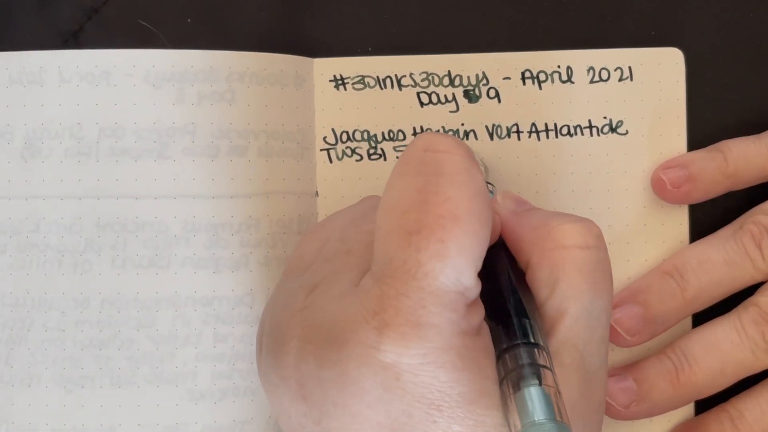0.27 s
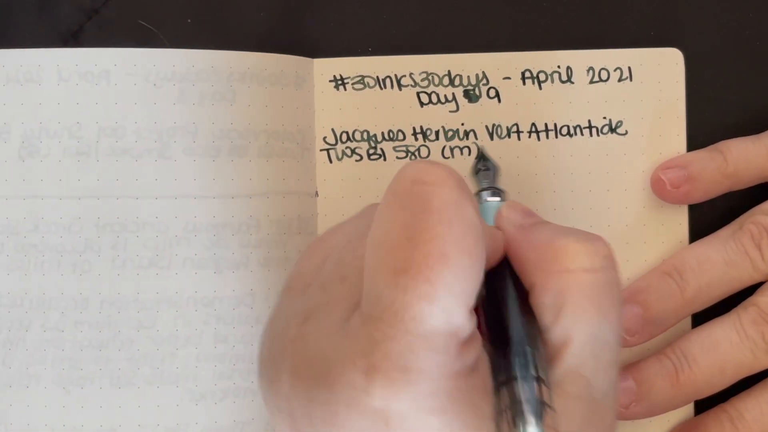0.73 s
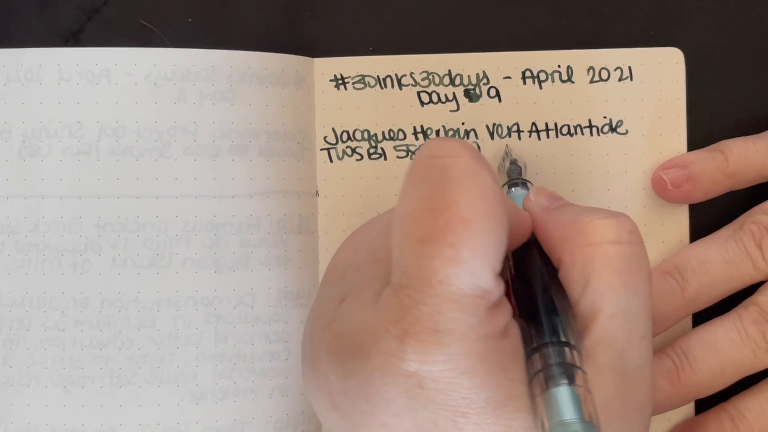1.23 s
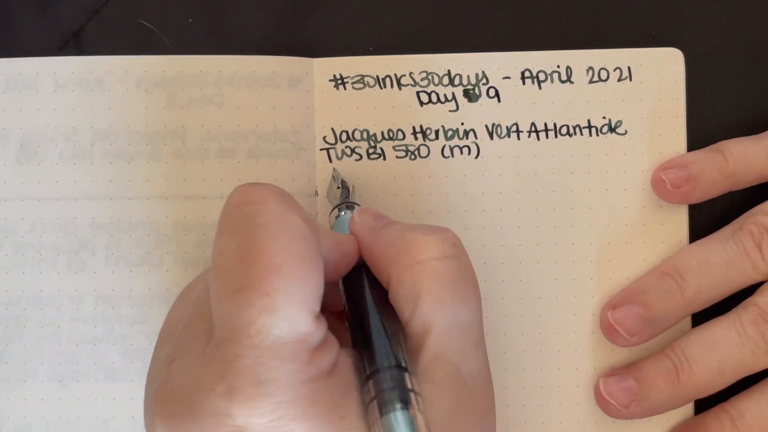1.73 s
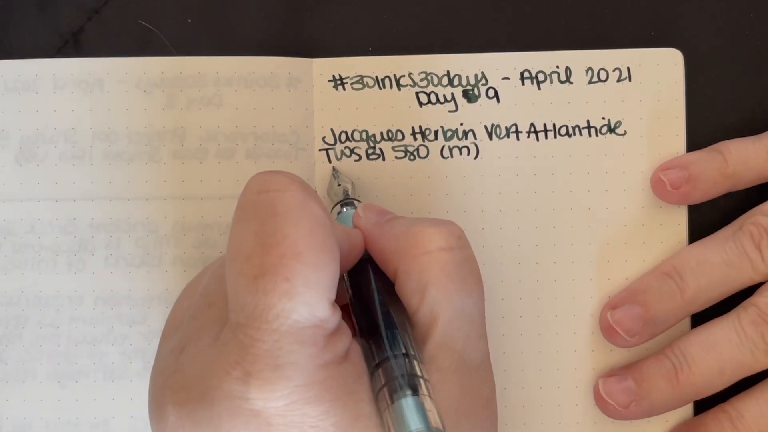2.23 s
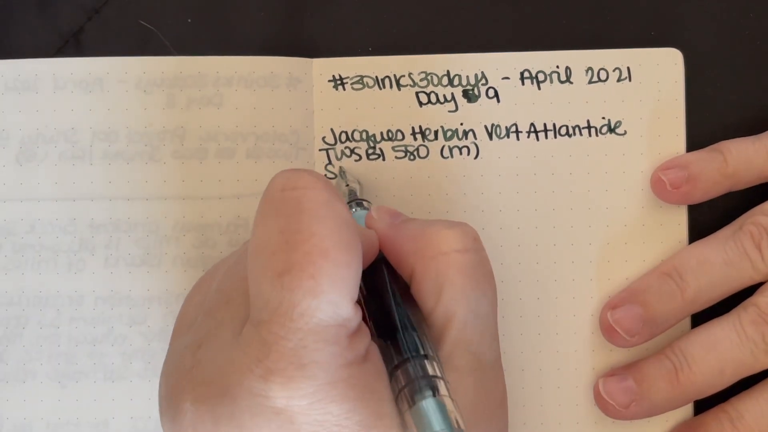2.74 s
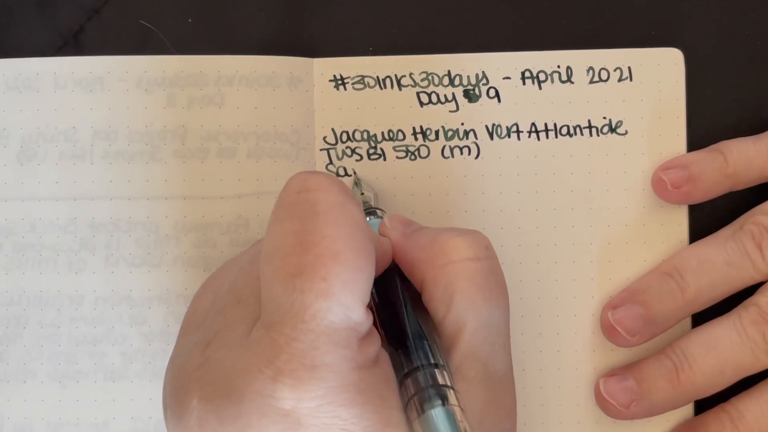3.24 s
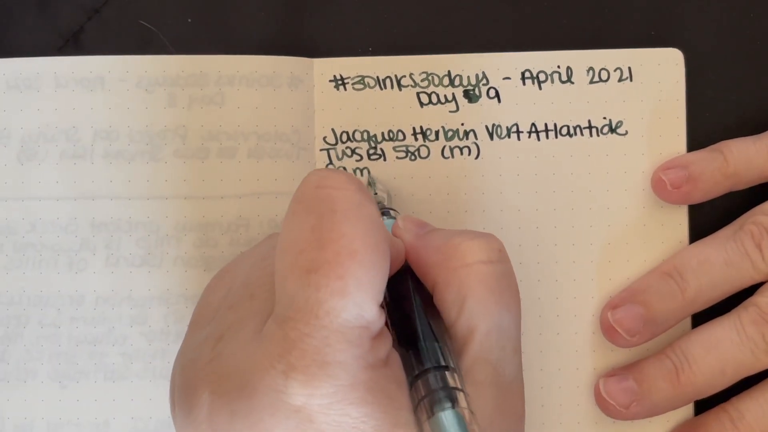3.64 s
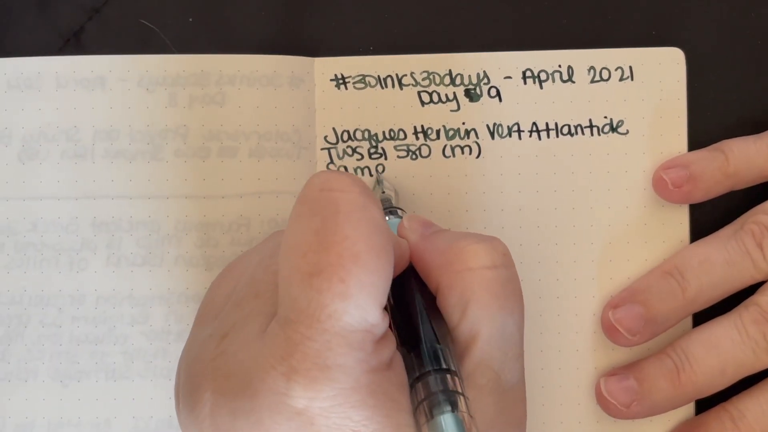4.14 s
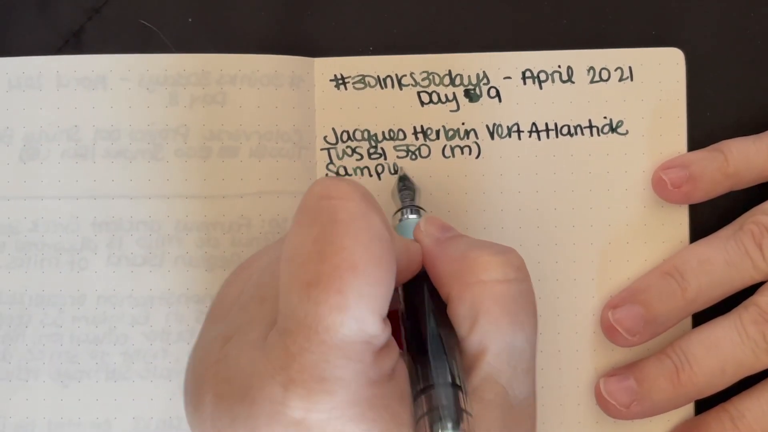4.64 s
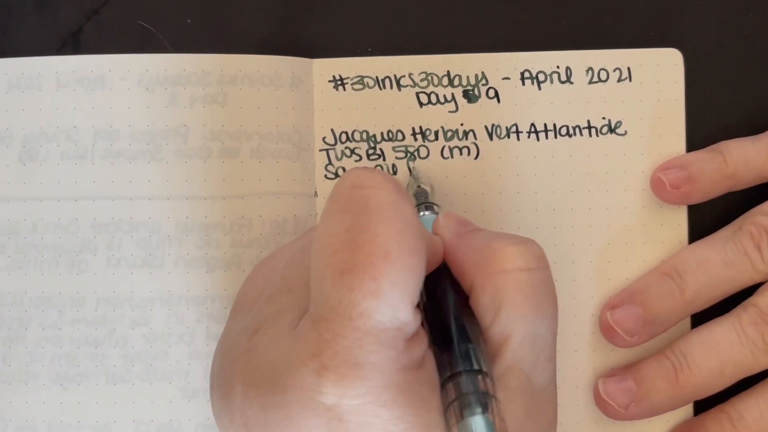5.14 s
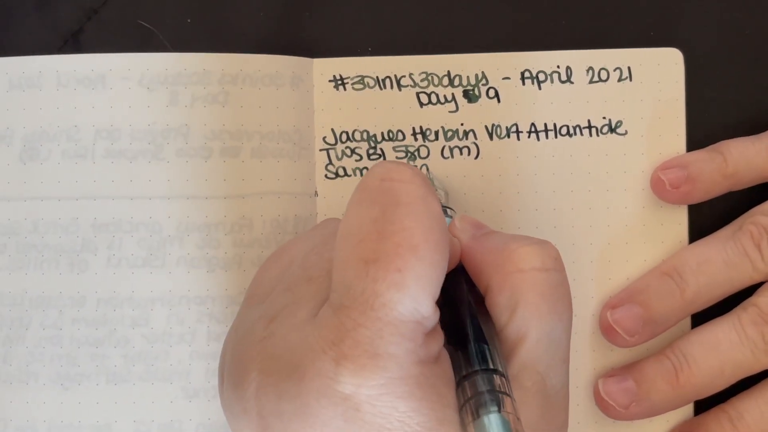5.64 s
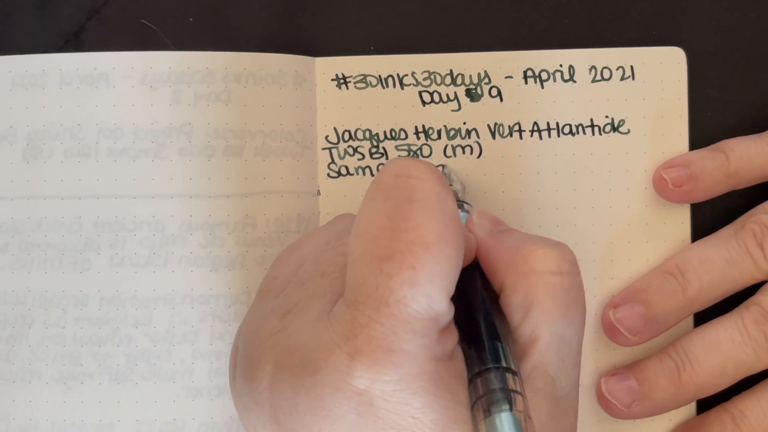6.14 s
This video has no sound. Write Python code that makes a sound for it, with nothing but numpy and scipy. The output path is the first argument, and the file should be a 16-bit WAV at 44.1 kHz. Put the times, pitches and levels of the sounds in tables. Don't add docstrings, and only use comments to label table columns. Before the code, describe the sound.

Very quiet, dry handwriting heard by a close microphone: papery palm rustle, a light double tap, two quick drags, then short whispery nib strokes in irregular groups. The loudest sound is a blunt knock of pen on page; a second knock arrives with a brisk hand slide. Near the end the nib sings faintly. A small room hums underneath with fan, airflow, low rumble and hiss.

```python
import sys
import numpy as np
from scipy import signal
from scipy.fft import rfft, irfft
from scipy.io import wavfile
from scipy.ndimage import uniform_filter1d

SR = 44100
rng = np.random.default_rng(int(sys.argv[2]) if len(sys.argv) > 2 else 0)


def makeup_ratio(level_db):
    decades = np.asarray(level_db, float) / 20
    return 10 ** decades


def transcribe(u):
    v = np.clip(np.atleast_2d(u).T, -1, 1)
    q = np.round(v * 32767).astype(np.int16)
    wavfile.write(sys.argv[1], SR, q)


N = 281799

# (time [s], level [dB])
RUMBLE_LEVEL = [(0.0, -45), (0.48, -47), (0.82, -40), (1.21, -51.5), (1.47, -37.5), (1.53, -46.5),
                (1.64, -37), (2.03, -51), (3.01, -42), (3.11, -53), (3.36, -39.5), (3.49, -55),
                (3.79, -37.5), (3.81, -44), (5.09, -37.5), (5.11, -44.5), (6.21, -38.5), (6.39, -46.5)]
# (time [s], level [dB])
AIR_LEVEL = [(0, -58.5), (.85, -60), (2.0, -58.6), (2.9, -58), (4.2, -60), (5.6, -59), (6.39, -59)]
# (time [s], level [dB])
DUCT_LEVEL = [(0, -57), (.66, -57), (1.28, -63), (2.4, -59), (2.7, -57), (4.3, -57), (4.6, -61),
              (6.39, -57)]
# (frequency [Hz], density [dB per Hz])
RUMBLE_SPECTRUM = [(3, -12), (7, -1), (14, -7), (20, -6.5), (23, -5.5), (26, -23), (30, -35)]
DUCT_SPECTRUM = [(22, -7), (30, -2), (50, -7.5), (85, -15.5), (140, -15.5), (170, -39)]
AIR_SPECTRUM = [(100, -27), (150, -5), (205, 1.5), (260, -3.5), (430, -5), (600, -9), (800, -15.5),
                (1100, -12.5), (1500, -16.5), (2300, -24), (3000, -29)]
HISS_SPECTRUM = [(1290, -2), (2200, -10), (2390, -7.5), (2960, -3.5), (3190, -1), (3290, -0.5), (3640, -2),
                 (4930, -1.5), (5490, -2.5), (7700, -2), (9230, -3), (13900, -3), (15800, -4)]
MAINS_PARTIALS = {1: -73, 3: -59, 4: -82, 5: -63, 7: -75.5}
MOTOR_PARTIALS = {5: -72, 6: -69.5, 7: -69, 8: -73}
IN_STEP = {3: 1.09, 5: .987, 7: 1.093}
# (middle [s], length [s], frequency [Hz], width [Hz], level [dB])
BRUSHES = [(0.106, 0.76, 1120, 750, -62.5), (0.047, 0.29, 3200, 4000, -63), (0.19, 0.27, 3700, 4300, -60),
           (0.144, .07, 7000, 1100, -64), (.55, 0.12, 5500, 900, -68), (2.36, 0.044, 1100, 180, -57.5),
           (0.533, 0.25, 780, 580, -60.5), (2.22, 1, 2200, 390, -73.5), (5.2, 0.39, 1700, 810, -67),
           (5.628, .07, 8100, 250, -62), (1.495, 0.11, 1390, 280, -62), (5.612, .035, 13500, 3000, -59),
           (4.615, .1, 15000, 3000, -57), (4.61, .1, 3000, 1200, -64), (4.95, .1, 4250, 250, -69),
           (.33, .17, 4500, 2500, -66), (5.95, 0.45, 2500, 430, -77)]
# (start [s], rise [s], fall [s], drag [dB], page body re drag [dB])
SLIDES = [
    (.243, 0.023, .075, -61, -2),
    (0.655, 0.026, .08, -58, -13),
    (1.31, 0.043, 0.078, -54.5, -10),
    (1.452, .04, .075, -51, -9),
    (4.566, .066, .058, -49.5, -6),
    (5.604, 0.013, 0.075, -62, -5),
]
# (fastest moment [s], length [s], level [dB], lean from tip towards tines [dB])
STROKES = [(.53, 0.15, -72, -2), (1.65, .08, -73, -2), (2.068, 0.07, -68, -5), (2.23, .08, -66, 1),
           (2.335, .17, -65.5, 2), (2.475, .085, -61.5, 0), (2.765, .15, -64, 0), (2.872, .08, -75, 2),
           (2.967, .09, -66.5, 2.5), (3.15, .08, -69, 4), (3.235, .06, -68, -3), (3.35, .11, -66, -1),
           (3.488, .05, -73, 3), (3.58, 0.12, -70, -0.5), (3.78, .08, -68, 0), (3.89, .1, -69, 5),
           (4.036, 0.081, -70.5, -2), (4.27, 0.22, -71, -4), (4.47, .07, -71, -3),
           (4.794, 0.11, -66.5, -1.5), (4.958, 0.17, -68.5, -2.5), (2.42, .06, -69, -2),
           (5.202, .1, -70, 0), (5.482, 0.057, -68, -1.5), (5.589, .08, -67, -3), (5.697, .07, -68, -4),
           (5.91, .14, -74, -1), (6.165, .07, -72, -4), (6.276, .1, -71, -2), (6.385, .07, -69, 3)]
# (time [s], peak [dB], contact softness [Hz], body pitch [Hz], ring share [0-1])
KNOCKS = [
    (.8005, -46, 4500, 2600, .8),
    (.8065, -48, 3500, 1900, .5),
    (2.362, -50, 700, 1000, .6),
    (3.108, -50, 9000, 5000, .3),
    (4.19, -54, 14000, 9000, .5),
    (2.5131, -24, 1050, 900, .17),
    (4.6249, -30, 1500, 1150, .35),
]
# (time [s], pitch [Hz], level [dB rms])
SQUEAK_START = [
    (5.07, 4150, -79),
    (5.11, 4350, -76),
    (5.16, 4700, -80),
]
SQUEAK_SONG = [
    (5.17, 4988, -83),
    (5.188, 5141, -72),
    (5.368, 5030, -76),
    (5.49, 5352, -74),
    (5.498, 5220, -78),
    (5.578, 5429, -76),
    (5.6, 5750, -80),
]
# (frequency [Hz], width [Hz], level [dB])
DRAG_MODES = [(4510, 1140, -1.5), (5610, 1380, -2.5), (7720, 1760, -3), (8830, 1450, -5)]
SKIN_MODES = [(11430, 2340, -1), (12800, 1600, -1), (14000, 2400, -0.14), (14900, 1300, -0.79)]
PAGE_MODES = [(950, 460, -3.5), (1440, 410, -4), (1975, 680, -4.5)]
SHEET_MODES = [(2540, 750, -1), (3350, 1600, 0)]
TINE_MODES = [(3100, 480, 1), (3440, 460, 0), (4080, 420, -4.5)]
SCRAPE_MODES = [(1060, 830, 1.5), (2150, 520, -5), (4260, 670, -3.5), (5500, 1200, -4.5)]
TIP_MODES = [(7250, 600, -4), (8150, 900, 0), (9400, 1400, -6), (12000, 2200, -4), (14300, 1500, -7)]

MAINS_HZ, MOTOR_HZ, FAN_HZ = 59.9, 59.266, 182.3
FAN_DB, HISS_DB = -65.5, -64.5
TWICE_MAINS_DB, TWICE_MAINS_RISE_DB_PER_S = -70, 1.53
CATCH_S, SWELL_DB_PER_S, EASE_DB, LIFT_DB = 0.0063, 150, -4.5, -21.5
SKIN_DB, SKIN_FADE_DB, SHEET_DB = 0.5, 4.5, -65.5
PRESS_SHARE, STROKE_FADE_DB, HOLD_SHARE, HOLD_DB = 0.38, -13.5, 0.22, -2.5
SCRAPE_DB = 0.8
RING_CYCLES = 16.7
SQUEAK_WOBBLE_HZ, SQUEAK_FLUTTER_DB = 15, 1.2


def rms_one(x):
    return x / np.sqrt(np.mean(x ** 2) + 1e-20)


def coloured(spectrum):
    hz, db = np.transpose(spectrum)
    bins = np.arange(1, N // 2 + 2) * SR / N
    gain = makeup_ratio(np.interp(np.log(bins), np.log(hz), db, left=-90, right=-90))
    return rms_one(irfft(rfft(rng.standard_normal(N)) * gain, N))


def drift(rate_hz):
    r = np.exp(-2 * np.pi * rate_hz / SR)
    noise = rng.standard_normal(N + SR)
    settled = signal.lfilter([1], [1, -2 * r, r * r], noise)[SR:]
    return rms_one(settled)


def level(rows):
    return makeup_ratio(np.interp(np.arange(N) / SR, *np.transpose(rows)))


def along(start, length, shares, db):
    share = (np.arange(N) / SR - start) / length
    inside = ((share > 0) & (share < 1)) * 1.0
    soft_edges = uniform_filter1d(inside, size=177)
    return soft_edges * makeup_ratio(np.interp(share, shares, db))


def resonate(x, modes):
    out = 0
    for k, (hz, width, db) in enumerate(modes):
        r = np.exp(-np.pi * width / SR)
        zeros = [(1 - r * r) / 2, 0, (r * r - 1) / 2]
        poles = [1, -2 * r * np.cos(2 * np.pi * hz / SR), r * r]
        section = zeros + poles
        out = out + (-1) ** k * makeup_ratio(db) * signal.sosfilt([section, section], x)
    return rms_one(out)


def fibres(per_s, spread_db):
    caught = rng.random(N) < per_s / SR
    uneven_db = spread_db * np.minimum(rng.exponential(1, N), 4)
    clumps_db = 0.51 * drift(52)
    return caught * makeup_ratio(uneven_db + clumps_db) * rng.choice([-1, 1], N)


def room_tone():
    rumble = level(RUMBLE_LEVEL) * coloured(RUMBLE_SPECTRUM)
    duct = level(DUCT_LEVEL) * coloured(DUCT_SPECTRUM)
    air = makeup_ratio(2.5) * level(AIR_LEVEL) * coloured(AIR_SPECTRUM)
    hiss = makeup_ratio(HISS_DB) * coloured(HISS_SPECTRUM)
    return rumble + duct + air + hiss


def hum():
    lines = [(k, k * MAINS_HZ, db) for k, db in MAINS_PARTIALS.items()]
    lines += [(k, k * MOTOR_HZ, db) for k, db in MOTOR_PARTIALS.items()]
    lines += [(3, FAN_HZ, FAN_DB)]
    t = np.arange(N) / SR
    load_gain = makeup_ratio(TWICE_MAINS_DB + TWICE_MAINS_RISE_DB_PER_S * t)
    out = np.sqrt(2) * load_gain * np.sin(4 * np.pi * MAINS_HZ * t)
    for k, hz, db in lines:
        since = t - IN_STEP.get(k, rng.random())
        sway_db = 0.5 * drift(0.5)
        out = out + np.sqrt(2) * makeup_ratio(db + sway_db) * np.cos(2 * np.pi * (hz * since + k * k / 7))
    return out


def brushes():
    t = np.arange(N) / SR
    rub = fibres(per_s=9000, spread_db=3.5)
    out = 0
    for middle, length, hz, width, db in BRUSHES:
        swell = np.cos(np.pi * np.clip((t - middle) / length, -0.5, 0.5)) ** 2
        out = out + makeup_ratio(db) * swell * resonate(rub, [(hz, width, 0)])
    return out


def hand():
    drag, skin, page, sheet = np.zeros((4, N))
    for start, rise, fall, db, page_db in SLIDES:
        length = rise + fall
        moments = np.array([0, CATCH_S, rise, rise + fall / 2, length]) / length
        grip = along(start, length, moments, [LIFT_DB, -SWELL_DB_PER_S * rise, 0, EASE_DB, LIFT_DB])
        skin_db = db + SKIN_DB
        drag += grip * makeup_ratio(db)
        skin += grip * along(start, length, [0, 1], [skin_db, skin_db - SKIN_FADE_DB])
        page += grip * makeup_ratio(db + page_db)
        sheet += grip * makeup_ratio(SHEET_DB)
    rub = fibres(per_s=15000, spread_db=2.5)
    bright = drag * resonate(rub, DRAG_MODES) + skin * resonate(rub, SKIN_MODES)
    return bright + page * resonate(rub, PAGE_MODES) + sheet * resonate(rub, SHEET_MODES)


def nib():
    tines, scrape, tip = np.zeros((3, N))
    moments = [0, PRESS_SHARE, PRESS_SHARE + HOLD_SHARE, 1]
    for fastest, length, db, lean_db in STROKES:
        end_db = db + STROKE_FADE_DB
        speed = along(fastest - PRESS_SHARE * length, length, moments, [end_db, db, db + HOLD_DB, end_db])
        tines += speed * makeup_ratio(lean_db)
        scrape += speed * makeup_ratio(SCRAPE_DB)
        tip += speed * makeup_ratio(-lean_db)
    bumps = fibres(per_s=6000, spread_db=3.5)
    low = tines * resonate(bumps, TINE_MODES) + scrape * resonate(bumps, SCRAPE_MODES)
    return low + tip * resonate(bumps, TIP_MODES)


def knocks():
    out = np.zeros(N)
    before = SR // 200
    t = np.arange(-before, SR // 10) / SR
    after = np.maximum(t, 0)
    modes = [(0.62, -0.6), (1.1, 1), (1.45, 0.5), (1.95, -0.7)]
    for s, db, soft_hz, hz, ring in KNOCKS:
        dent = (np.pi * soft_hz * t) ** 2
        push = np.exp(-dent) - 0.3 * np.exp(-dent / 9)
        late = t - 0.21 / soft_hz
        body = sum(share * np.sin(2 * np.pi * ratio * hz * late) for ratio, share in modes)
        release = 1 - np.exp(-(3 * soft_hz * after) ** 2)
        decay = makeup_ratio(-60 * after * hz / RING_CYCLES)
        at = round(s * SR) - before
        out[at:at + len(t)] += makeup_ratio(db) * (ring * body * release * decay - push)
    return out


def squeak():
    out = 0
    for rows in (SQUEAK_START, SQUEAK_SONG):
        s, hz, db = np.transpose(rows)
        pitch = np.interp(np.arange(N) / SR, s, hz) + SQUEAK_WOBBLE_HZ * drift(59)
        length = s[-1] - s[0]
        gain = along(s[0], length, (s - s[0]) / length, db) * makeup_ratio(SQUEAK_FLUTTER_DB * drift(30))
        out = out + np.sqrt(2) * gain * np.sin(2 * np.pi * np.cumsum(pitch) / SR)
    return out


def scene():
    room = room_tone() + hum()
    page = brushes() + hand() + nib() + knocks() + squeak()
    return (room + page)[None]


def band_limit(x):
    return signal.sosfilt(signal.butter(12, 15920, fs=SR, output="sos"), x)


def record(dry):
    return band_limit(dry)


dry = scene()
out = record(dry)
transcribe(out)
```